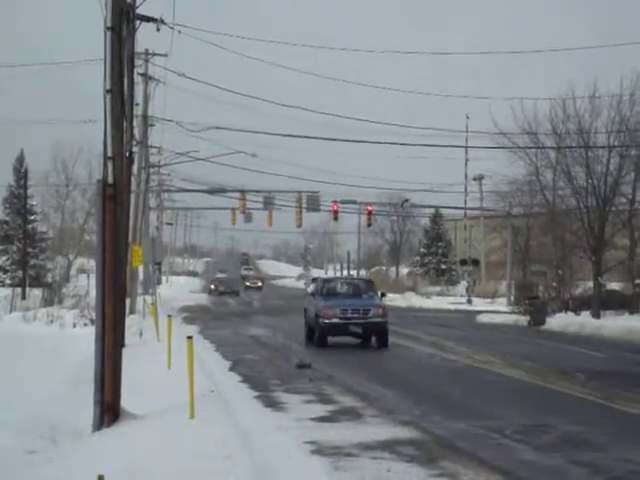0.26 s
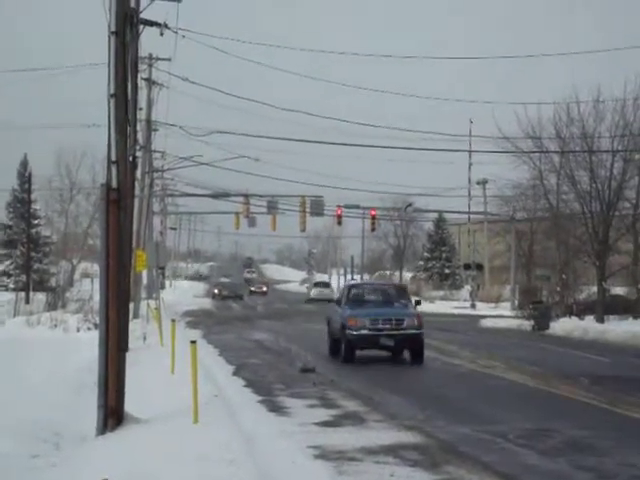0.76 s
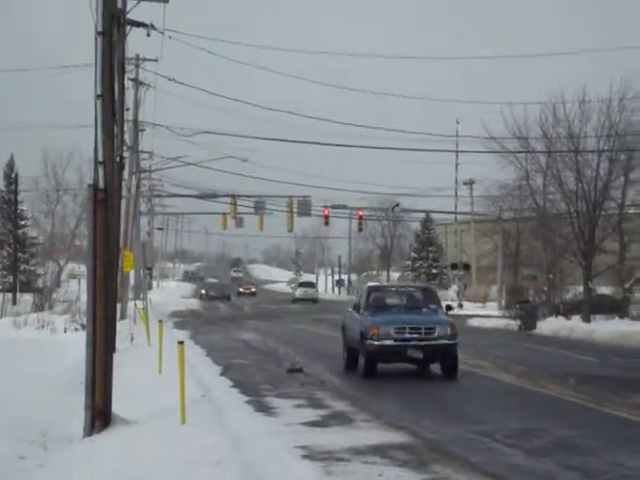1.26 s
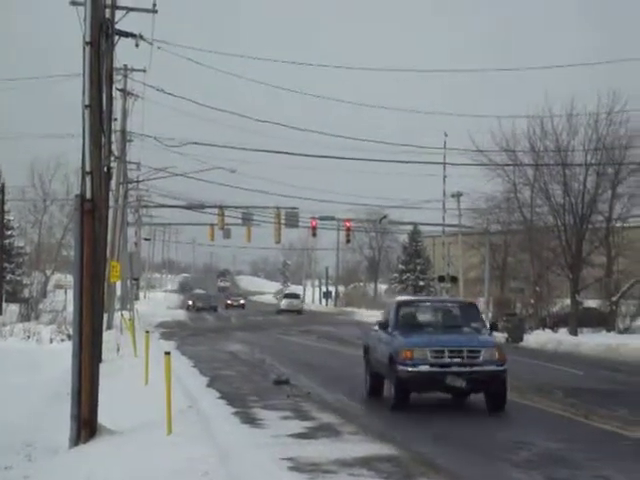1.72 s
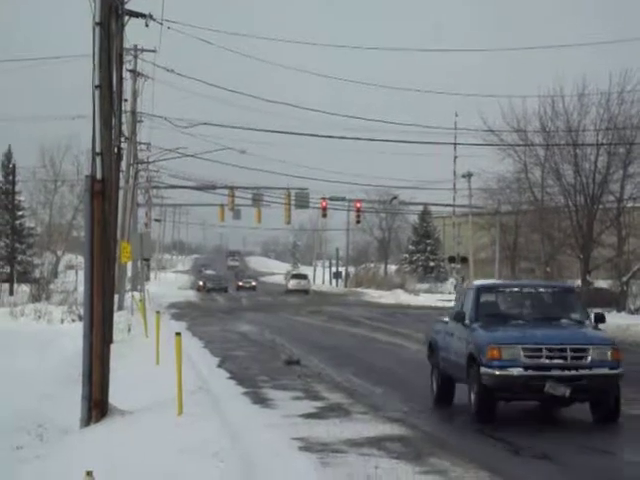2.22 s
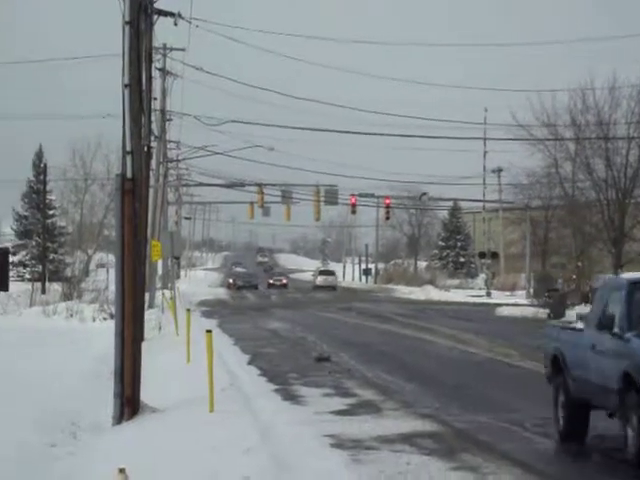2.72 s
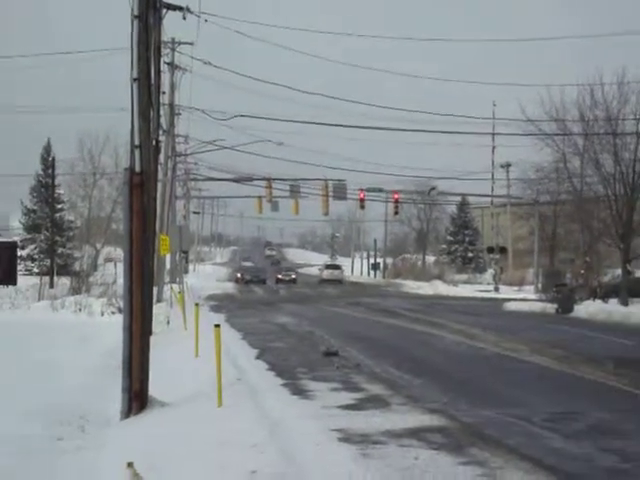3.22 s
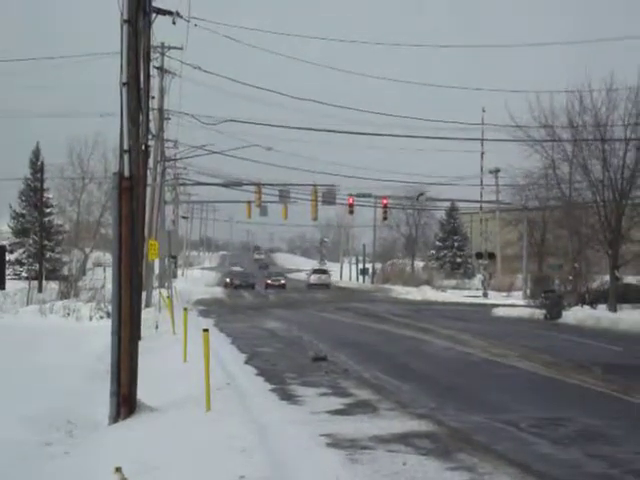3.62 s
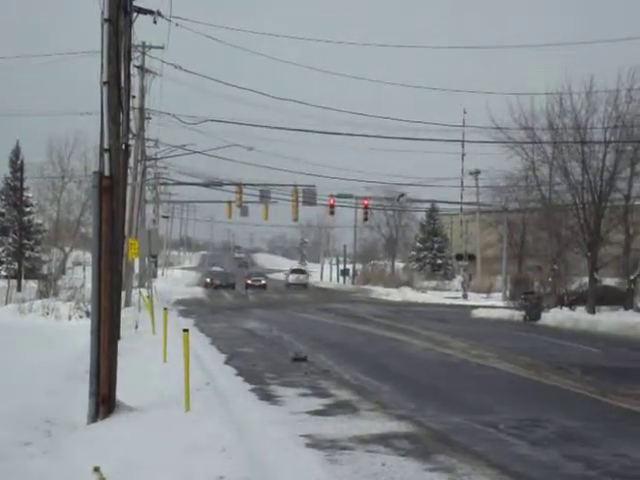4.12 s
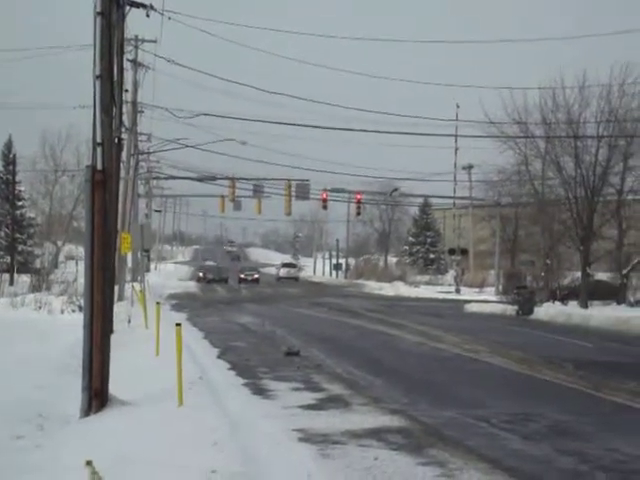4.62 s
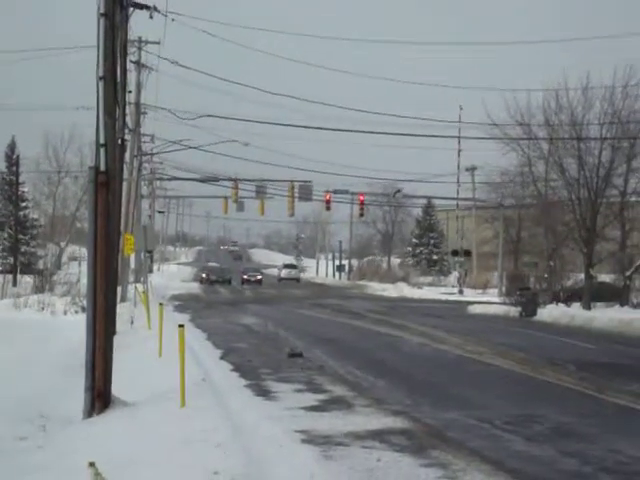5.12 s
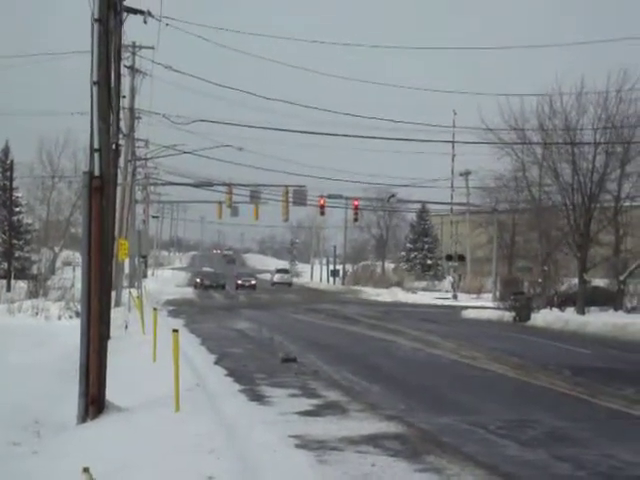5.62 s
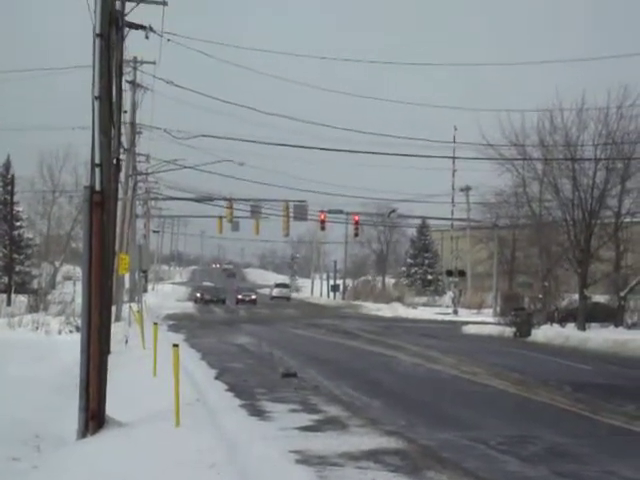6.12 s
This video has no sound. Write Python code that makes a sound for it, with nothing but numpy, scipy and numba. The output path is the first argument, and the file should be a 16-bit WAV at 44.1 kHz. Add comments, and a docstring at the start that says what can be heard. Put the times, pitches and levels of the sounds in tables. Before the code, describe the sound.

Beside a wet, slushy road, a vehicle passes right away, its exhaust booming and its tyres hissing as it fades. A pickup then approaches with a low growl and a swish, passes with a roar of tyres and hums away, throwing spray. Distant traffic drones throughout. Gusts rumble on the small, slightly dull microphone, and faint ticks and clicks come with each pass.

```python
"""Verge of a wet, slushy road. One vehicle passes and hums away, its exhaust booming; then a pickup
approaches and passes, growling ahead and humming behind. Wet tyres swish ahead of each vehicle, roar
alongside and throw spray behind. Distant traffic drones and wind buffets a small, narrow-band
microphone. The loudest moments tick and click faintly."""
import sys
import numpy as np
from scipy import signal
from scipy.fft import rfft, irfft
from scipy.io import wavfile
from scipy.ndimage import uniform_filter1d, minimum_filter1d
from numba import njit

SR = 44100
rng = np.random.default_rng(int(sys.argv[2]) if len(sys.argv) > 2 else 0)


def output_pcm(signal):
    """Save a mono or channel-first signal as 16-bit PCM at the path in sys.argv[1].

    Samples are clipped to [-1, 1] before scaling.
    """
    pcm = np.clip(np.atleast_2d(signal).T, -1, 1) * 32767
    wavfile.write(sys.argv[1], SR, np.round(pcm).astype(np.int16))


N = 280608
TIME_S = np.arange(N) / SR
SOUND_M_S = 343

# Vehicle paths. Each: time abreast in seconds, speed in m/s, closest distance in m, tyre gain in dB.
LEAVING_PATH = (0.3751, 12.5, 5, -4)
PICKUP_PATH = (4, 13, 7, 0)
# Leaving engine. Each row: time in seconds, cycle rate in Hz, fourth-order boom gain in dB.
LEAVING_ENGINE = [(0.0, 63.5, -22), (0.06, 62.4, -18), (0.19, 62.3, -16.5), (0.25, 61.9, -22.5),
                  (0.31, 61.6, -20.5), (0.49, 61.2, -18.5), (0.53, 61.0, -28.5), (0.63, 60.2, -18),
                  (0.76, 61.4, -32), (1.02, 62.0, -25), (1.24, 62.6, -29.5), (1.34, 63.4, -36),
                  (1.57, 64.7, -34), (2.4, 65.24, -39.5)]
# Engine harmonics. Each row: multiple of the base rate, relative level in dB.
EXHAUST_ORDERS = [(1, -4.5), (2, -1), (3, -7.5), (7, -14.5), (8, -17.5), (9, -15.5)]
HUM_ORDERS = [(2, -0.5), (3, -8), (4, -18.5)]
GROWL_ORDERS = [(3, -1.5), (4, -9), (5, -13.5)]
# Noise spectra. Each row: frequency in Hz, relative density in dB.
ROAR_SPECTRUM = [(50, -15.5), (100, 2.5), (170, -2), (220, 0.5), (295, -5), (370, -3), (510, -5),
                 (580, -4.5), (720, -1.5), (860, 0), (1050, -4.5), (1300, -5), (2000, -25.5)]
SWISH_SPECTRUM = [(600, -17), (950, -3.5), (1330, 2), (1650, 0.5), (1950, -1), (2300, 0.5), (2620, 2),
                  (3000, -13.5), (3600, -34), (5000, -44)]
SPRAY_SPECTRUM = [(1700, -33), (2300, -19.5), (2570, -2), (2810, 2), (3000, -1.5), (3170, -6.5),
                  (3400, -13), (4000, -34), (5500, -51.5)]
MIST_SPECTRUM = [(2600, -19), (3200, -0.5), (3600, 4.5), (4000, -1), (4400, -6.5), (4750, -13.5),
                 (5100, -24), (5500, -28.5), (5900, -45.5), (6300, -69)]
WASH_SPECTRUM = [(20, -5.5), (80, 11), (140, 7.5), (220, 0.5), (290, -2.5), (380, -2), (560, -1.5),
                 (850, -9.5), (1080, -1), (1350, -0.5), (2000, -2), (2750, -2.5), (3400, -32),
                 (5100, -26.5), (6100, -49)]
WIND_SPECTRUM = [(4, -6.5), (12, 5), (25, -4), (45, -7), (80, -26), (200, -37), (600, -70.5)]
# Tyre radiation. Each row: bearing in degrees (negative on approach), roar, swish, spray, mist in dB.
TYRE_BEAM = [(-74, -17, -18, -21.5, -38), (-68, -15.5, -14, -15.5, -36), (-56.5, -16, -11, -18, -37),
             (-44, -17.5, -16, -17, -36), (-11.5, -17, -19.5, -19.5, -38), (13.5, -16, -19.5, -21.5, -35),
             (44, -17.5, -17.5, -15.5, -30), (57.5, -20, -20.5, -15, -30.5), (75, -21, -17.5, -20.5, -36)]
# Swells of tyre spray and hiss, the last a broad rise at the end.
# Each row: centre in seconds, width in seconds, boost in dB.
SPRAY_SWELLS = [(.02, .15, 6), (.17, .05, 3), (.68, 0.16, 0), (3.69, 0.16, 2.5), (4.76, .36, 1.5),
                (5.39, 0.16, 2.5), (6.3, 0.9, 4.5)]
# Far drone swells. Each row: centre in seconds, width in seconds, boost in dB.
DRONE_SWELLS = [(1.92, .16, 10), (2.25, .08, 7.5), (2.48, .16, 8.5), (3.25, .4, 4), (5.6, .22, 6),
                (5.91, 0.087, 6.5), (6.27, 0.26, 5.5)]
# Gusts on the microphone. Each row: peak time in seconds, level in dB.
GUSTS = [(.24, -19), (.58, -18.5), (.84, -30.5), (1.55, -22), (1.77, -33.5), (3.06, -30.5), (3.79, -27.5),
         (4.08, -25), (4.51, -25), (5.079, -25), (5.28, -28.5), (6.34, -34)]
# Sharp clicks and bright ticks. Each row: time in seconds, relative level in dB.
CLICKS = [(0.0303, -46), (0.0598, -39), (0.1506, -42.5), (0.2962, -45), (0.3282, -35), (0.3666, -39),
          (0.4985, -34), (0.5254, -45), (3.465, -50), (3.5034, -40), (3.6007, -36), (3.633, -31.5),
          (3.7373, -27), (3.7547, -32), (3.8452, -37), (3.8926, -45), (3.9479, -44), (3.9769, -40),
          (4.0692, -50), (4.1106, -34), (4.1485, -50), (4.2126, -46), (4.3261, -35), (4.353, -41),
          (4.3794, -43), (4.4764, -33), (4.6, -36), (4.6929, -25.5)]
TICKS = [(.061, -31), (.152, -27.5), (.33, -31.5), (.499, -34), (3.633, -29), (3.755, -32), (3.95, -28.5),
         (4.07, -30.5), (4.112, -27.5), (4.15, -25.5), (4.22, -30), (4.354, -28.5), (4.366, -29),
         (4.478, -35.5), (4.693, -29.5)]
# Pickup engine radiation. Each row: bearing in degrees, exhaust hum, growl, exhaust gas in dB.
PICKUP_BEAM = [(-76, -23.5, -29, -44.5), (-66.5, -23, -26.5, -43), (-44, -23, -27, -27.5),
               (-26.5, -19, -30, -27), (7.5, -18, -29, -22.5), (49.5, -18, -26.5, -23),
               (63, -18.5, -34.5, -25.5), (72.5, -18, -40, -27.5)]


def undb(db):
    """Decibels to gain."""
    return 10 ** (np.asarray(db) / 20)


def unit(x):
    """Scale to rms 1."""
    return x / np.sqrt(np.mean(x ** 2))


def lookup(table, at):
    """Interpolate each later column against the first."""
    axis, *columns = np.transpose(table)
    return [np.interp(at, axis, column) for column in columns]


def swells_db(table):
    """Sum of bell-shaped rises."""
    return sum(db * np.exp(-(2 * (TIME_S - centre_s) / width_s) ** 2) for centre_s, width_s, db in table)


def noise():
    """White noise."""
    return rng.standard_normal(N)


def colour(x, spectrum):
    """Filter by a spectrum, silent above its last point; rms 1."""
    hz, db = np.transpose(spectrum)
    bins_hz = np.maximum(np.arange(N // 2 + 1) * SR / N, 1)
    gain_db = np.interp(np.log(bins_hz), np.log(hz), db, right=-np.inf)
    return unit(irfft(rfft(x) * undb(gain_db), N))


def walk(rate_hz):
    """Random steps, smoothed twice; rms 1."""
    hold = int(SR / rate_hz)
    steps = np.repeat(noise()[:N // hold + 1], hold)
    return unit(uniform_filter1d(uniform_filter1d(steps, hold), hold)[:N])


@njit
def bandpass(x, centre_hz, width_hz):
    """State-variable band-pass, gain 1 at its moving centre."""
    y = np.empty(len(x))
    band_state, low_state = 0., 0.
    for i in range(len(x)):
        g, damping = np.tan(np.pi * centre_hz[i] / SR), width_hz / centre_hz[i]
        band = (band_state + g * (x[i] - low_state)) / (1 + g * (g + damping))
        band_state = 2 * band - band_state
        low_state += 2 * g * band
        y[i] = damping * band
    return y


def resonant_noise(hz, width_hz):
    """Noise in one steep-sided resonance; rms 1."""
    centre_hz, width_hz = np.full(N, float(hz)), float(width_hz)
    return unit(bandpass(bandpass(noise(), centre_hz, width_hz), centre_hz, width_hz))


def passing(path, behind_m=0):
    """Distance over closest distance, bearing and Doppler factor of a point on a vehicle."""
    abreast_s, speed_m_s, closest_m, _ = path
    along_m = speed_m_s * (TIME_S - abreast_s) - behind_m
    bearing_rad = np.arctan2(along_m, closest_m)
    doppler = 1 / (1 + speed_m_s * np.sin(bearing_rad) / SOUND_M_S)
    return np.hypot(along_m, closest_m) / closest_m, np.degrees(bearing_rad), doppler


def engine(hz, orders, jitter, flutter_db):
    """Harmonics of an unsteady shaft; each flutters on its way through the air."""
    phase = 2 * np.pi * np.cumsum(hz * (1 + jitter * walk(25))) / SR
    tone = np.zeros(N)
    for order, db in orders:
        tone += undb(db + flutter_db * walk(11)) * np.sin(order * phase + 2 * np.pi * rng.random())
    return np.sqrt(2) * tone


def leaving_vehicle(fade_db_per_s=4.5, boom_hold_s=1.8):
    """A booming, raspy exhaust sags, then rises a little in pitch as it fades down the road."""
    hz, boom_db = lookup(LEAVING_ENGINE, TIME_S)
    distance_ratio, bearing_deg, _ = passing(LEAVING_PATH)
    rearward_db = 2.5 * np.sin(np.radians(bearing_deg))  # the pipe points backwards
    exhaust_db = -19 - fade_db_per_s * TIME_S + rearward_db
    exhaust = engine(hz, EXHAUST_ORDERS, jitter=.009, flutter_db=1)
    rasp = resonant_noise(hz=308, width_hz=63) * undb(-8.5)
    boom = engine(hz, [(4, .35)], jitter=.004, flutter_db=2.14)
    boom_fade_db = fade_db_per_s * np.maximum(TIME_S - boom_hold_s, 0)
    return (exhaust + rasp) * undb(exhaust_db) / distance_ratio + boom * undb(boom_db - boom_fade_db)


def droplets(per_s, scatter_db):
    """Dense tiny impacts of uneven size."""
    hits = rng.random(N) < per_s / SR
    return unit(hits * noise() * undb(scatter_db * noise()))


def ground_bounce(direct, distance_ratio, abreast_hz=1263, width_hz=250., depth=.43):
    """The road reflection cuts a notch that sinks in pitch with distance."""
    return direct - depth * bandpass(direct, abreast_hz / distance_ratio ** .2, width_hz)


def tyres(path):
    """Tread roars, water squeezed from the grooves swishes ahead, drops fly behind as spray and mist."""
    *_, tyre_db = path
    distance_ratio, bearing_deg, _ = passing(path)
    roar_db, swish_db, spray_db, mist_db = lookup(TYRE_BEAM, bearing_deg)
    surge = walk(22)  # spray and mist flicker together
    swell_db = swells_db(SPRAY_SWELLS)
    roar = colour(noise(), ROAR_SPECTRUM) * undb(roar_db + .5 * walk(12))
    swish = colour(noise(), SWISH_SPECTRUM) * undb(swish_db + .28 * walk(14))
    spray = colour(droplets(per_s=16000, scatter_db=3.5), SPRAY_SPECTRUM)
    spray *= undb(spray_db + swell_db + .3 * surge)
    mist = colour(droplets(per_s=8000, scatter_db=.5), MIST_SPECTRUM)
    mist *= undb(mist_db + swell_db + .98 * surge)
    direct = (roar + swish + spray + mist) * undb(tyre_db) / distance_ratio
    return ground_bounce(direct, distance_ratio)


def distant_traffic(drone_rise_db_per_s=.52, approach_db_per_s=1.92):
    """Far engines drone and waver; oncoming tyres sing ever louder over the wash of the road."""
    tone = engine(66.9, [(1, 0)], jitter=.038, flutter_db=5)
    drone = 1.4 * tone + .6 * resonant_noise(hz=74.5, width_hz=59)
    drone *= undb(-37.5 + drone_rise_db_per_s * TIME_S + swells_db(DRONE_SWELLS))
    oncoming = resonant_noise(hz=895, width_hz=300) * undb(-42.5 + approach_db_per_s * TIME_S)
    wash = colour(noise(), WASH_SPECTRUM) * undb(-27.5 + .42 * walk(5.6))
    return drone + oncoming + wash


def wind(breeze_db=-33.5, attack_s=.085, release_s=.13):
    """Gusts buffet the microphone over a light breeze; their power rises and decays exponentially."""
    power = undb(breeze_db) ** 2
    for peak_s, db in GUSTS:
        envelope = np.exp(-np.maximum((peak_s - TIME_S) / attack_s, (TIME_S - peak_s) / release_s))
        power = power + undb(db) ** 2 * envelope
    return colour(noise(), WIND_SPECTRUM) * np.sqrt(power) * undb(walk(12))


def clicks(gain_db=11, band_hz=(3000, 11000)):
    """Each click is a single spike with no bass."""
    spikes = np.zeros(N)
    for time_s, db in CLICKS:
        spikes[int(time_s * SR)] = undb(db + gain_db)
    return signal.sosfilt(signal.butter(1, band_hz, "bandpass", fs=SR, output="sos"), spikes)


def ticks(pitch_hz=5050, half_width_s=.00044):
    """Each tick is a few bright cycles under a bell-shaped envelope."""
    out = np.zeros(N)
    lag_s = np.arange(-88, 89) / SR
    envelope = np.exp(-(lag_s / half_width_s) ** 2)
    for time_s, db in TICKS:
        detune, phase = rng.standard_normal(2)
        cycles = np.cos(2 * np.pi * (pitch_hz * (1 + .02 * detune) * lag_s + phase))
        start = int(time_s * SR) - len(lag_s) // 2
        out[start:start + len(lag_s)] += undb(db) * envelope * cycles
    return out


def pickup(steady_shaft_hz=46.66, coast_hz_per_s=1.15, coast_until_s=3.6, tailpipe_m=1.4):
    """The slowing engine growls through the grille; once past, the tailpipe hums and puffs lower."""
    distance_ratio, bearing_deg, doppler = passing(PICKUP_PATH, behind_m=tailpipe_m)
    shaft_hz = steady_shaft_hz + coast_hz_per_s * np.maximum(coast_until_s - TIME_S, 0)
    heard_hz = shaft_hz * doppler
    hum_db, growl_db, gas_db = lookup(PICKUP_BEAM, bearing_deg)
    hum = engine(heard_hz, HUM_ORDERS, jitter=.0076, flutter_db=1.5)
    growl = engine(heard_hz, GROWL_ORDERS, jitter=.012, flutter_db=1.5)
    firing = 1 + .5 * np.sin(2 * np.pi * np.cumsum(2 * heard_hz) / SR)  # two puffs a turn
    gas = unit(resonant_noise(hz=376, width_hz=153) * firing)
    return (hum * undb(hum_db) + growl * undb(growl_db) + gas * undb(gas_db)) / distance_ratio


def limiter(x, threshold):
    """A fast, smoothed gain dip holds down the highest peaks."""
    gain = minimum_filter1d(threshold / np.maximum(np.abs(x), threshold), size=201)
    return x * uniform_filter1d(uniform_filter1d(gain, size=101), size=101)


def scene():
    """The roadside, in mono."""
    vehicles = tyres(LEAVING_PATH) + leaving_vehicle() + tyres(PICKUP_PATH) + pickup()
    return (vehicles + distant_traffic() + wind() + ticks())[None]


def record(dry):
    """A limited, narrow-band input; faint clicks reach above its band."""
    band_hz, top_hz = 6000, 15800
    in_band = np.arange(N // 2 + 1) * SR / N < band_hz
    narrow = irfft(rfft(limiter(dry, threshold=.72)) * in_band, N)
    top_cut = signal.ellip(8, .2, 70, top_hz, fs=SR, output="sos")
    return signal.sosfilt(top_cut, narrow + clicks())


dry = scene()
out = record(dry)
output_pcm(out)
```